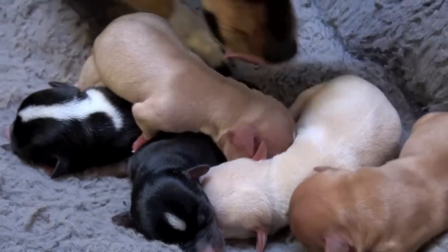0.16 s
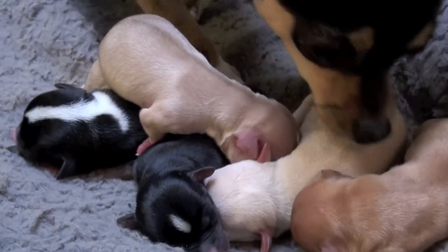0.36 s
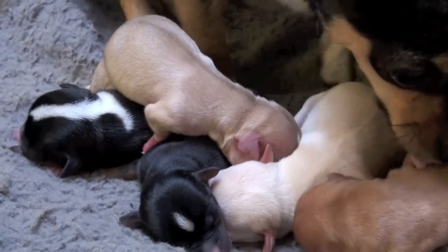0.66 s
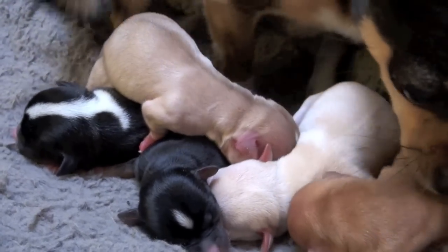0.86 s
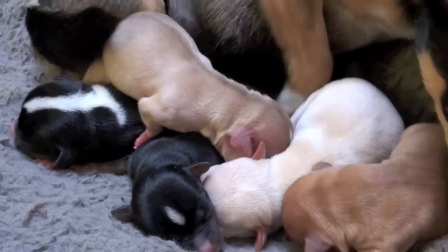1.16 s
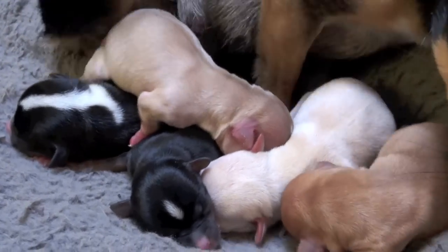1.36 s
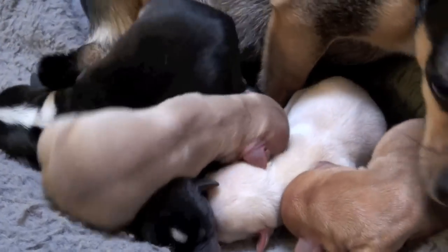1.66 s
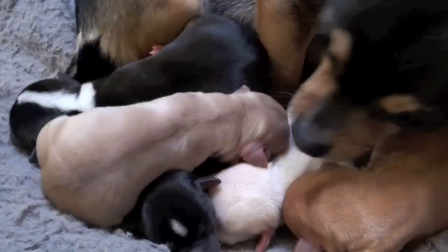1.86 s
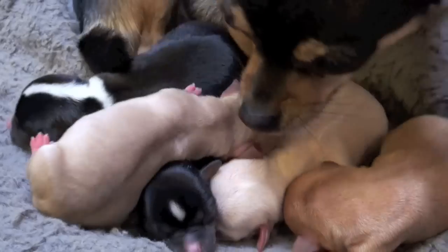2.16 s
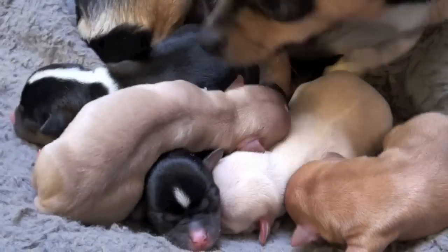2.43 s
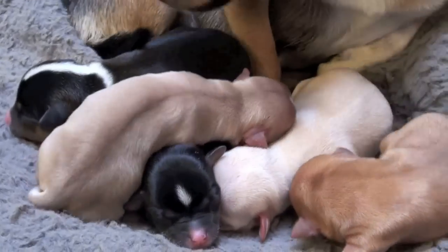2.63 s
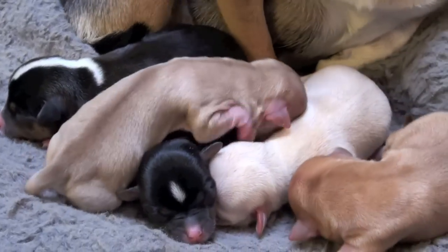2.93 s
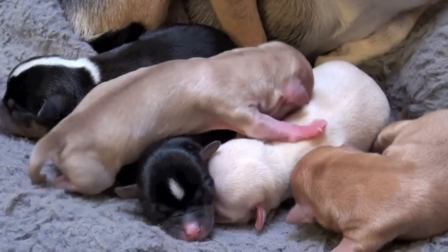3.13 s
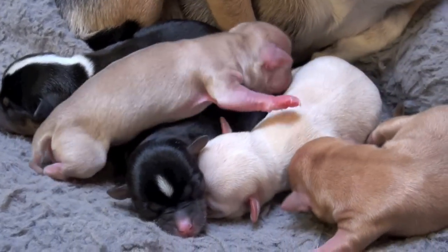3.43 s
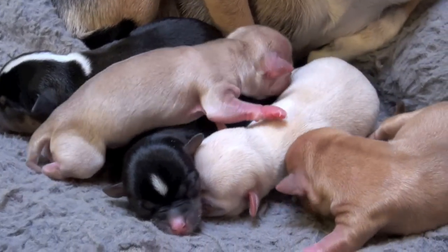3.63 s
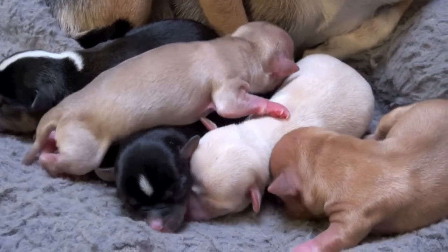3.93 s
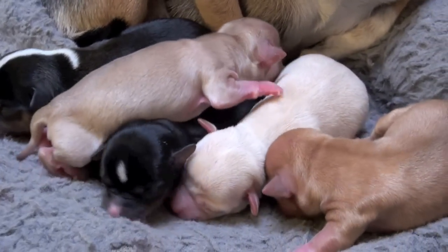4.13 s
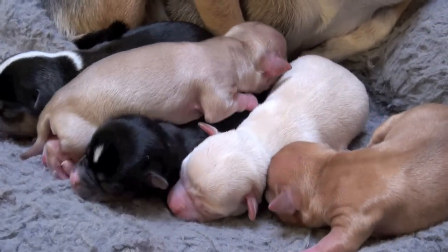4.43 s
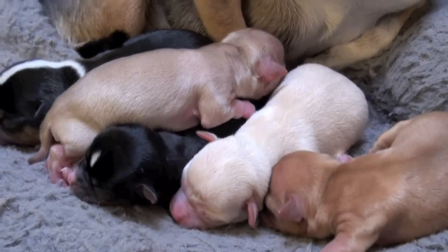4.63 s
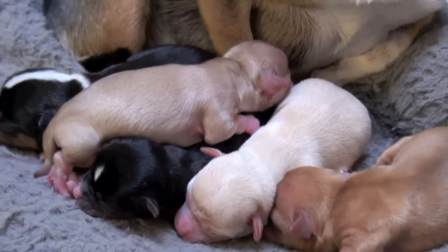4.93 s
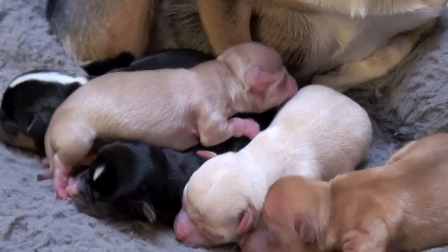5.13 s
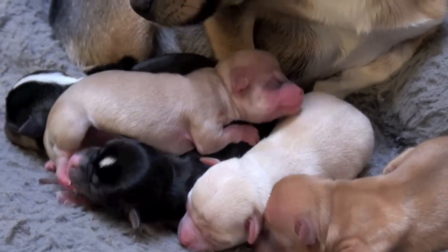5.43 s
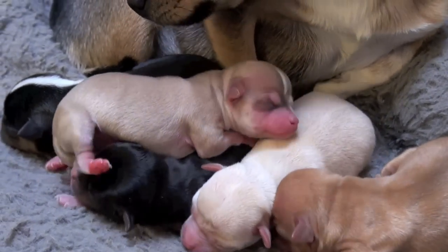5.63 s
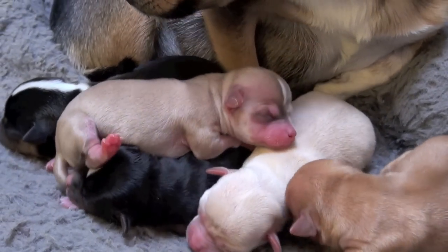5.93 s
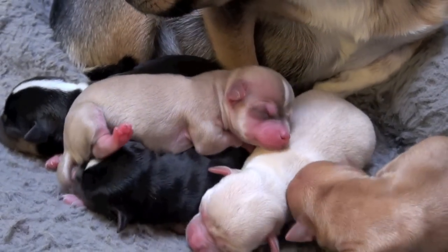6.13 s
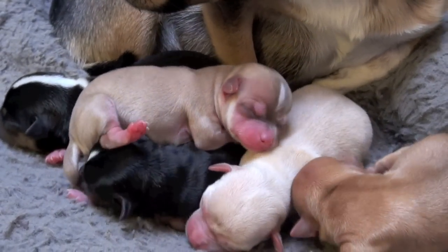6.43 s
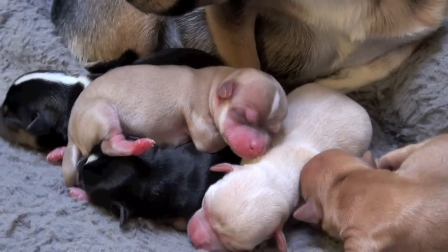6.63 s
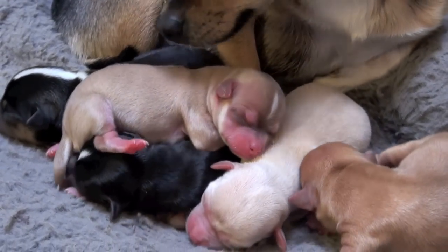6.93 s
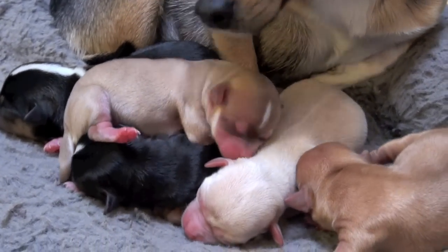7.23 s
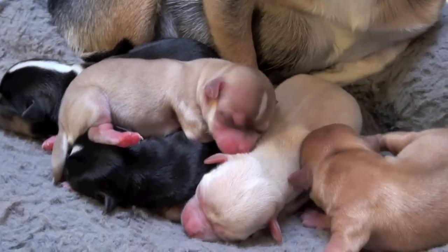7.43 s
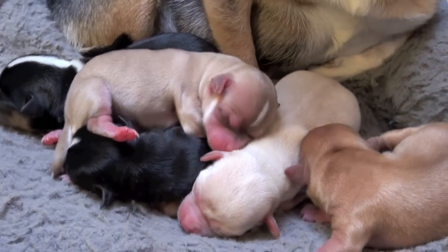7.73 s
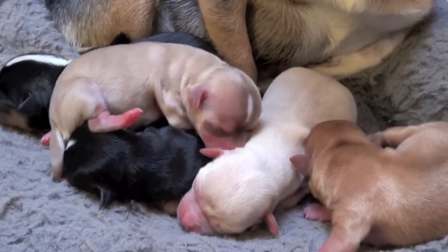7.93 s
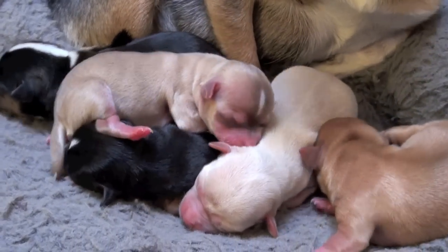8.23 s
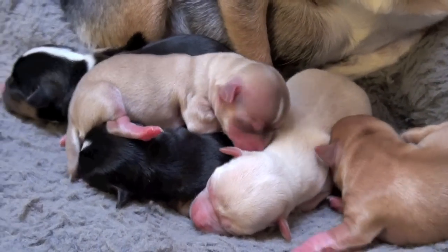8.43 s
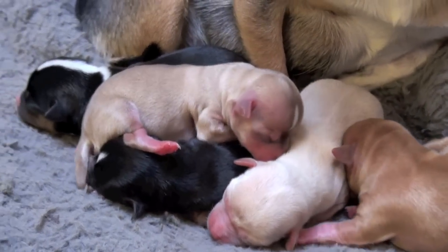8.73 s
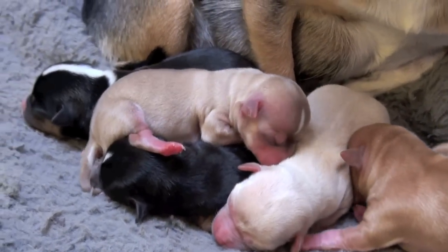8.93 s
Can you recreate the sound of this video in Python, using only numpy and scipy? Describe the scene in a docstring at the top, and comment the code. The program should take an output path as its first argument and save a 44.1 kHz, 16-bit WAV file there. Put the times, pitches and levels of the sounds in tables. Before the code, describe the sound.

A heap of newborn puppies heard very close in a small furnished room. A squeal and sharp yelp open, then faint whines and wet licking. After a lull, louder wavering cries rise and fall, and the mother gives a low fluttering growl of about a second. Several puppies then cry together, thinning to small squeaks and a bump at the end. Blanket rustle and faint hum stay underneath.

```python
"""In a small room, newborn puppies squeak and whimper on a blanket near the microphone, often several at once.
Their cries are near-pure tones with overtones shaped by throat and nose; rasps are uneven pulse trains.
Their mother's licks are ringing noise bursts; her one short growl is flaps of vocal fold pulses with hiss.
The blanket rustles, as coloured noise with ticks, over room noise and a faint mains hum."""
import sys
import numpy as np
from scipy import signal
from scipy.fft import rfft, irfft, next_fast_len
from scipy.io import wavfile
from scipy.ndimage import uniform_filter1d, map_coordinates

SR = 44100
rng = np.random.default_rng(int(sys.argv[2]) if len(sys.argv) > 2 else 0)


def inscribe(sig):
    """Save sig as 16-bit PCM at rate SR to the path in sys.argv[1].

    A 1-D sig is mono; a 2-D sig holds one channel per row.
    Samples are clipped to [-1, 1] before scaling.
    """
    pcm = np.round(np.clip(np.atleast_2d(sig).T, -1, 1) * 32767)
    wavfile.write(sys.argv[1], SR, pcm.astype(np.int16))


N = 399976
TOP_HZ = 15800  # band limit
MID_PITCH_HZ = 1500  # middle of the puppies' pitch range

# courses of the wavering cries, referred to by WHIMPERS: t/s, pitch f/Hz, level/dB
SQUEAL = [(0.058, 1820, -56), (0.092, 1541, -42.5), (0.132, 1890, -40.5), (0.186, 2027, -40.5),
          (0.216, 1965, -43), (0.242, 1510, -42), (0.33, 910, -51)]
THIN_WHINE = [(0.33, 940, -48), (0.522, 1182, -58), (0.62, 1215, -58), (0.695, 1450, -60),
              (0.735, 1324, -54.5), (0.916, 1292, -50), (0.986, 1104, -52.5), (1.068, 1077, -55),
              (1.114, 1178, -55), (1.228, 1134, -53)]
LOW_WHINE = [(1.218, 1104, -53), (1.232, 872, -54.5), (1.266, 820, -60.5), (1.366, 928, -56.5),
             (1.5, 882, -56.5), (1.568, 1050, -46.5), (1.62, 1055, -52.5)]
CLIMBING_CRY = [(3.425, 1014, -53), (3.461, 1223, -43), (3.468, 1427, -42), (3.516, 1840, -40),
                (3.523, 1537, -39.5), (3.6, 1247, -46.5), (3.645, 1482, -40.5), (3.703, 1638, -32.5),
                (3.757, 1457, -39), (3.8, 1562, -40), (3.87, 1846, -32), (3.915, 1684, -33.5),
                (3.955, 1350, -36.5), (4.018, 972, -39)]
HIGH_CRY = [(4.725, 1464, -49.5), (4.799, 2175, -43.5), (4.804, 1740, -37), (4.85, 2153, -37.5),
            (4.887, 2184, -38), (5.015, 2072, -37), (5.05, 1970, -35), (5.12, 1914, -36.5),
            (5.225, 1982, -36), (5.289, 1746, -33.5), (5.34, 1388, -42.5)]
DOUBLE_CRY = [(5.61, 1430, -44.5), (5.668, 1874, -32), (5.752, 1560, -40.5), (5.836, 1826, -33),
              (5.89, 1798, -34), (5.97, 1543, -36.5), (6.07, 1346, -38.5)]
TRIPLE_CRY = [(6.32, 1455, -49), (6.358, 1980, -44), (6.42, 1696, -37), (6.47, 1646, -39.5),
              (6.53, 1797, -39.5), (6.598, 1825, -37), (6.665, 1620, -36.5), (6.73, 1764, -37),
              (6.77, 1596, -40), (6.85, 1052, -44.5)]
SHARP_CRY = [(7.07, 1270, -37), (7.092, 1560, -33.5), (7.108, 1293, -35), (7.145, 1640, -30),
             (7.195, 1786, -32.5), (7.245, 1788, -36.5), (7.29, 1967, -37), (7.347, 1938, -34),
             (7.375, 1688, -35), (7.403, 953, -37)]
ANSWER = [(7.15, 1206, -40.5), (7.19, 1545, -46), (7.244, 1612, -44), (7.306, 1370, -44.5),
          (7.406, 1492, -42.5), (7.482, 1031, -41), (7.55, 1140, -47)]
HELD_WHINE = [(7.245, 1275, -50), (7.282, 992, -44.5), (7.335, 1393, -53), (7.48, 1264, -54),
              (7.778, 1468, -52.5), (7.9, 1363, -55), (8.19, 1448, -56.5)]
SINKING_WHINE = [(7.485, 1645, -51), (7.519, 1834, -57), (7.559, 1705, -50), (7.603, 1211, -54.5),
                 (7.675, 1273, -49), (7.8, 630, -60.5)]
SOARING_CRY = [(7.705, 1100, -43.5), (7.745, 1570, -38.5), (7.846, 2270, -47), (7.89, 2117, -42.5),
               (7.924, 1743, -37.5), (7.957, 900, -40)]
LAST_CRY = [(8.205, 1413, -54), (8.222, 1416, -39), (8.272, 1650, -36), (8.315, 1668, -39.5),
            (8.36, 1843, -41.5), (8.395, 1450, -42), (8.432, 810, -49.5)]
CATCHING_WHINE = [(8.204, 1410, -45), (8.219, 1047, -44), (8.234, 1222, -47), (8.267, 1383, -41)]
LOUD_YELP = [(.166, 1300, -41), (.2, 1665, -28), (.25, 1762, -30), (.29, 1728, -34), (.322, 1280, -39.5)]
CREAKING_YELP = [(2.699, 831, -50), (2.718, 1008, -48), (2.748, 1014, -48.5), (2.768, 725, -53),
                 (2.801, 397, -66)]


def amp(db):
    """Amplitude factor of a level in dB."""
    return 10 ** (np.asarray(db) / 20)


def unit(x):
    """x scaled to rms 1."""
    return x / np.sqrt(np.mean(x ** 2) + 1e-20)


def along(points, hz):
    """(f/Hz, value) points, interpolated on a log frequency axis."""
    f, v = np.transpose(points)
    return np.interp(np.log(hz + 1), np.log(f + 1), v)


def curves(rows, t):
    """Each column after the time, interpolated at the times t."""
    s, *cols = np.transpose(rows)
    return [np.interp(t, s, c) for c in cols]


def span(start, end):
    """Sample times of a stretch and a gate with 2.3 ms edges."""
    t = np.arange(int(start * SR), int(max(end, start + .01) * SR)) / SR
    return t, np.clip(np.minimum(t - t[0], t[-1] - t) / 0.0023, 0, 1)


def add(track, s, x):
    """Mix x into the track at s seconds."""
    i = int(np.clip(s * SR, 0, N))
    track[..., i:i + x.shape[-1]] += x[..., :N - i]


def wobble(t, rate):
    """A smooth random curve, rate knots a second."""
    at = (t - t[0]) * rate
    return map_coordinates(rng.standard_normal(int(at[-1]) + 4), [at])


def filtered(x, response):
    """x with its spectrum multiplied by response(hz)."""
    m = next_fast_len(x.shape[-1] + 8192)
    hz = np.fft.rfftfreq(m, 1 / SR)
    return irfft(rfft(x, m) * response(hz), m)[..., :x.shape[-1]]


def noise(spectrum, size=N):
    """Coloured noise of rms 1."""
    return unit(filtered(rng.standard_normal(size), lambda hz: amp(along(spectrum, hz))))


def wide_noise(spectrum, side_db):
    """Stereo noise, nearly the same at both ports."""
    return noise(spectrum) + amp(side_db) * noise(spectrum) * np.array([[1], [-1]])


def tap(hz, t60, width):
    """A short decaying burst of one tone and a noise band around it, peak 1."""
    t = np.arange(SR // 8) / SR
    grit = noise([(hz / 4, -16), (hz, 0), (hz * 1.42, -4), (hz * 1.75, -19), (hz * 4, -32)], size=len(t))
    envelope = amp(-60 * t / t60) * (1 - np.exp(-t / 0.0002))
    x = (np.sin(2 * np.pi * hz * t) + width * grit) * envelope
    return x / np.abs(x).max()


def background(air_db, fibre_db):
    """Fur brushes the blanket, with single fibres ticking, over room noise and hum."""
    # stirring on the blanket, before a 2.7 dB cut: t/s, level/dB
    stirring = [(0, -53.5), (1.2, -54), (2.3, -54), (3.1, -56.5), (5, -53), (6.25, -50), (6.9, -54),
                (8.93, -52), (9.02, -45)]
    # colour of the rustle: f/Hz, gain/dB
    blanket = [(53, -40), (90, -11), (122, -3.5), (434, -7.5), (800, -6), (4840, -19), (15500, -22.5)]
    # colour of the room noise: f/Hz, gain/dB
    air = [(12, -48), (20, -5), (64, 2), (92, -4), (122, -34), (333, -33), (15500, -25.5)]
    # mains hum: t/s, fundamental level/dB, second harmonic level/dB; both waver
    hum_levels = [(0, -68, -63), (3, -71, -74), (4.8, -67, -72), (5.6, -61, -68)]
    mains_hz = 60
    t = np.arange(N) / SR
    stir = amp(curves(stirring, t)[0] - 2.7 + .8 * wobble(t, 12))
    ticks = (rng.random(N) < 25 / SR) * rng.standard_normal(N)  # about 25 a second
    fibres = unit(signal.fftconvolve(ticks, tap(3100, 0.0039, width=2.3))[:N])
    rustle = stir * (wide_noise(blanket, side_db=-11) + amp(fibre_db) * fibres)
    hum = np.zeros(N)
    for k, db in enumerate(curves(hum_levels, t), 1):
        level = amp(db + 1.5 * wobble(t, 15)) * np.sqrt(2)
        hum += level * np.sin(2 * np.pi * k * mains_hz * t + 2.2 * wobble(t, 12.0))
    return rustle + hum + amp(air_db) * wide_noise(air, side_db=-12)


def overtones(phase, hz, t, slope_db, dip_hz, flicker_db, count=7):
    """Harmonics above the fundamental, shaped by the throat to rms about 1, less the band that the nose swallows."""
    # a puppy's throat: f/Hz, gain/dB
    throat = [(1600, -0.5), (2100, 7.5), (3500, 9), (5100, 1.5), (5950, -8), (9000, -14), (15000, -19)]
    nose_dip_db, nose_half_width_octaves = 11.5, 0.19
    k = np.arange(2, count + 1)[:, None]
    gains = amp(along(throat, k * hz) + slope_db * np.log2(k)) * (k * hz < TOP_HZ)
    gains = gains / np.sqrt(np.sum(gains ** 2, axis=0) / 2)
    octaves_off = np.log2(k * hz / dip_hz)
    nose = amp(-nose_dip_db * np.exp(-(octaves_off / nose_half_width_octaves) ** 2))
    flicker = amp(flicker_db * np.array([wobble(t, 35.9) for _ in k]))
    return np.sum(gains * nose * flicker * np.sin(k * phase), axis=0)


def cry(t, hz, level_db, bright_db, slope_db, dip_hz, jitter=0.00356, shimmer=0.023):
    """Tiny vocal folds whistle almost purely; slack folds, at low pitch, tremble more and sound richer."""
    attack_s, release_s = .005, .003
    # per dB below the cry's peak: overtones weaken and fall off faster
    effort_bright_db, effort_tilt_db = 0.3, 0.02
    purity_db_per_octave = 5.5  # overtones fade as the pitch climbs
    pan_db = 0.26  # left over right
    gate = np.clip(np.minimum((t - t[0]) / attack_s, (t[-1] - t) / release_s), 0, 1)
    hz = uniform_filter1d(hz, size=350, mode="nearest")
    slack_db = level_db.max() - level_db
    slope_db = slope_db - effort_tilt_db * slack_db
    over_db = bright_db - effort_bright_db * slack_db - purity_db_per_octave * np.log2(hz / MID_PITCH_HZ)
    tremble = jitter * (MID_PITCH_HZ / hz) ** 2 * (wobble(t, 59.95) + wobble(t, 900))
    hz = hz * (1 + tremble)
    phase = 2 * np.pi * np.cumsum(hz) / SR
    tone = np.sqrt(2) * np.sin(phase)
    tone = tone + amp(over_db) * overtones(phase, hz, t, slope_db, dip_hz, flicker_db=2.5)
    voice = tone * gate * amp(level_db) * (1 + shimmer * wobble(t, 800))
    return voice * amp([[pan_db / 2], [-pan_db / 2]])


def rasp(start, end, pitch, db):
    """The folds slip to a low pitch and beat unevenly, each beat a decaying noise ring."""
    # throat of a rasp: f/Hz, gain/dB
    rasp_throat = [(450, -18), (750, -1), (2400, 0.5), (3800, -9), (6000, -17), (10000, -45)]
    t, gate = span(start, end)
    cycles = np.cumsum(pitch * (1 + .05 * wobble(t, pitch))) / SR
    pulses = np.diff(np.floor(cycles), prepend=0) * amp(2 * rng.standard_normal(len(t)))
    ring = rng.standard_normal(len(t)) * np.exp(-(t - t[0]) * pitch)
    beats = signal.fftconvolve(pulses, ring)[:len(t)]
    voice = filtered(beats, lambda hz: amp(along(rasp_throat, hz)))
    return amp(db) * gate * unit(voice)


def arch(t, top, start_hz, top_hz, end_hz):
    """The pitch of one push of breath: it rounds over at its top, with a start and an end of its own."""
    arch_power = 1.85  # 2 is a parabola, 1 a pointed roof
    rising = t < top
    away = np.abs(t - top) / np.maximum(np.where(rising, top - t[0], t[-1] - top), 1 / SR)
    return top_hz + (np.where(rising, start_hz, end_hz) - top_hz) * away ** arch_power


def puppies():
    """Wavering cries, short squeaks and rasps from the heap, all fluttering in the tremors."""
    # wavering cries: course, overtone level/dB, overtone slope/(dB/octave), nose dip f/Hz
    whimpers = [(SQUEAL, 6.6, -2, 6000), (LOUD_YELP, -5.5, -11, 2900), (THIN_WHINE, -2.2, -1.3, 3740),
                (LOW_WHINE, 3.2, -10.5, 3520), (CREAKING_YELP, 1, -18.5, 3000),
                (CLIMBING_CRY, -3.5, -7, 2750), (HIGH_CRY, -4.5, -3.5, 5220), (DOUBLE_CRY, -10.5, 0, 2060),
                (TRIPLE_CRY, -5, -1.7, 5000), (SHARP_CRY, -12, -0.78, 6700), (ANSWER, -4.5, -3, 4340),
                (HELD_WHINE, 0, -7, 2030), (SINKING_WHINE, 0.74, 2.8, 3060), (SOARING_CRY, -13, -4, 6700),
                (LAST_CRY, -16, -12, 5600), (CATCHING_WHINE, -7, -5, 4300)]
    # squeaks, one pitch arch each: t/s, rise/s, fall/s, start f/Hz, top f/Hz, end f/Hz,
    # level at the top/dB, overtone level/dB, overtone slope/(dB/octave)
    squeaks = [(1.66, 0.035, 0.012, 850, 966, 956, -51, 2, -4),
               (3.215, 0.0064, 0.058, 2070, 1875, 1570, -52, -10, 0),
               (3.985, 0.042, 0.087, 1344, 1563, 910, -36.5, -3.5, -17),
               (4.283, 0.053, 0.0032, 1660, 1874, 1800, -45, -11, -7),
               (4.331, 0.07, 0.051, 1422, 1540, 1190, -36.5, -8, -9),
               (4.449, 0.0016, 0.013, 1180, 1084, 694, -36.5, -15.5, 1),
               (7.645, 0.062, 0.0072, 784, 1113, 1100, -47.5, 0.5, -23),
               (8.089, 0.0086, 0.12, 2040, 2004, 1710, -50, -22, -10),
               (8.717, 0.022, 0.018, 1110, 1140, 1070, -50, -8.5, 1),
               (8.744, 0.058, 0.16, 1786, 1916, 1730, -48, -23, -12),
               (8.95, 0.042, 0.075, 1377, 1367, 1147, -42, -6.5, -11)]
    # rasps: start t/s, end t/s, pitch f/Hz, level/dB
    rasps = [(1.162, 1.224, 386, -48), (2.753, 2.803, 331, -55), (7.143, 7.41, 379.5, -50.5)]
    # flutter of a hard-pushed cry: start t/s, end t/s, rate f/Hz, depth [0-1]
    tremors = [(3.665, 3.745, 125, .5)]
    squeak_db_per_octave, squeak_dip_hz = 2.5, 3010  # level follows pitch
    out = np.zeros((2, N))
    for course, bright_db, slope_db, dip_hz in whimpers:
        t, _ = span(course[0][0], course[-1][0])
        hz, level_db = curves(course, t)
        add(out, t[0], cry(t, hz, level_db, bright_db, slope_db, dip_hz))
    for start, rise, fall, start_hz, top_hz, end_hz, db, bright_db, slope_db in squeaks:
        t, _ = span(start, start + rise + fall)
        hz = arch(t, start + rise, start_hz, top_hz, end_hz)
        level_db = db + squeak_db_per_octave * np.log2(hz / top_hz)
        add(out, start, cry(t, hz, level_db, bright_db, slope_db, squeak_dip_hz))
    for start, end, pitch, db in rasps:
        add(out, start, rasp(start, end, pitch, db))
    for start, end, rate, depth in tremors:
        t, _ = span(start, end)
        swing = np.sin(2 * np.pi * rate * t + wobble(t, 50))
        beat = np.zeros(N)
        add(beat, start, depth * np.sqrt(np.hanning(len(t))) * swing)
        out = out * (1 + beat)
    return out


def nuzzling():
    """Licks and bumps ring briefly in one broad resonance; a low grunt is a gated tone."""
    # wet smacks of tongue and lips: t/s (0.9 ms early), peak level/dB (before +10 dB), resonance f/Hz
    smacks = [(0.575, -44, 2420), (0.612, -34.5, 2530), (0.6406, -46.5, 2540), (1.432, -45, 3600),
              (1.476, -46, 3800), (1.493, -39, 3930), (2.0333, -41.5, 3040), (2.045, -40.5, 1600),
              (2.0679, -43, 3440), (2.0901, -42.5, 2440), (2.2722, -43, 4240), (3.739, -51, 1770),
              (6.4007, -37, 1540)]
    # soft bumps of bodies and paws: t/s, peak level/dB, f/Hz
    bumps = [(1.011, -40.5, 219.5), (1.1, -38.5, 189.7), (1.118, -38, 241), (5.027, -36, 436),
             (9.049, -25, 615), (9.052, -24, 255)]
    # low grunt: start t/s, end t/s, pitch f/Hz, level/dB
    grunts = [(8.872, 8.925, 137, -39)]
    out = np.zeros(N)
    for s, db, hz in smacks:
        add(out, s + 0.0009, amp(db + 10.0) * tap(hz, t60=12 / hz, width=0.91))
    for s, db, hz in bumps:
        add(out, s, amp(db) * tap(hz, t60=0.018, width=0.09))
    for start, end, hz, db in grunts:
        t, gate = span(start, end)
        add(out, start, amp(db) * gate * unit(np.sin(2 * np.pi * hz * (t - start))))
    return out


def pulse_response(spectrum, size=2048):
    """The causal, minimum-phase ring of a throat after one pulse, energy 1."""
    cepstrum = irfft(np.log(amp(along(spectrum, np.fft.rfftfreq(size, 1 / SR)))))
    ring = irfft(np.exp(rfft(2 * cepstrum[:size // 2], size)))
    return ring / np.linalg.norm(ring)


def flaps():
    """(t/s, level/dB, vocal fold cycles) of each flap of the growl."""
    # flutter, broadly slowing as the breath runs out: t/s, flap rate f/Hz, fold cycles per flap
    flutter = [(5.109, 34.8, 1), (5.138, 32.9, 2), (5.168, 30.7, 2), (5.265, 30.9, 2), (5.298, 28.9, 2),
               (5.471, 28.9, 2), (5.505, 26, 3), (5.582, 26, 3), (5.621, 23.7, 3), (5.663, 24.5, 3),
               (5.7, 27.1, 2), (5.966, 26.2, 2), (6.004, 23.7, 3), (6.047, 24.2, 3), (6.088, 20.3, 4)]
    # push of the growl: t/s, level/dB (relative)
    effort = [(5.11, -28), (5.3, -22.5), (6.05, -22), (6.09, -26.5), (6.14, -33.5)]
    s, end_s = 5.1088, 6.15
    while s < end_s:
        rate, cycles = curves(flutter, s)
        yield s, curves(effort, s)[0], int(np.round(cycles))
        s += 1 / rate


def growl(pulse_db, hiss_db, opening, lips_db, jaw_q):
    """The throat flaps 20 to 35 times a second; each flap passes one to four fold cycles and a puff of air.
    Loose lips and cheeks give every flap a colour of its own."""
    # fold pitch and bared teeth: t/s, f/Hz, hiss level/dB (relative)
    growl_pitch = [(5.12, 208, 4), (5.3, 197, 9), (5.47, 177, -4), (5.66, 161, -5), (5.72, 184, -5),
                   (5.93, 174, -6), (6.01, 156, -7), (6.09, 140, -5), (6.14, 92, -11)]
    # the mother's throat: f/Hz, gain/dB
    dog_throat = [(55, -34), (115, -16.5), (175, 7), (250, 1.5), (335, -2.5), (460, -4.5), (640, -3),
                  (900, -14.5), (1300, -17), (1900, -32.5), (2600, -52.5), (5000, -40), (12000, -59)]
    # air hissing through her teeth: f/Hz, gain/dB
    teeth = [(2000, -27), (4600, -12), (5500, -14), (8000, 16), (9800, -11), (11900, 7.5), (14000, -22)]
    # mouth opening and closing: t/s, resonance f/Hz, strength of its ring [factor]
    jaw = [(5.12, 645, 1.5), (5.25, 600, 0.86), (5.38, 850, 0.12), (5.55, 653, 0.44), (5.76, 760, .1),
           (6.02, 620, 0.19)]
    quickening = 1.04  # speed-up from one fold cycle to the next within a flap
    voice, flow, t = np.zeros(N), np.zeros(N), np.arange(N) / SR
    bands_hz = np.geomspace(50, TOP_HZ, num=40)
    for start, db, number in flaps():
        pulses = np.zeros(SR // 10)
        hz = curves(growl_pitch, start)[0] * np.exp(0.012 * rng.standard_normal())
        lead = closing = 1 / hz
        for k in range(number):
            # the folds kick the air weakly as they open and harder as they close
            cycle = 1 / (hz * quickening ** k)
            opening_s = closing - cycle * rng.normal(.5, .025)
            add(pulses, opening_s, opening * amp([db + 2 * rng.standard_normal()]))
            add(pulses, closing, amp([db + rng.standard_normal()]))
            closing += cycle
        slack_db = lips_db * np.minimum(bands_hz / 900, 1) * rng.standard_normal(len(bands_hz))
        throat = np.transpose([bands_hz, along(dog_throat, bands_hz) + slack_db])
        flap = signal.fftconvolve(pulses, pulse_response(throat))
        jaw_hz, gape = curves(jaw, start)
        mouth = signal.lfilter(*signal.iirpeak(jaw_hz, jaw_q, SR), flap)
        add(voice, start - lead, flap + gape * mouth)
        puff = np.exp(-t[:len(pulses)] / 0.00099)
        add(flow, start - lead, signal.fftconvolve(pulses, puff))
    bared_db = curves(growl_pitch, t)[1]
    return amp(pulse_db) * voice + amp(hiss_db + bared_db) * flow * noise(teeth)


def room(x, side_db):
    """A small furnished room: a short, soft tail of decaying noise, 5 ms late."""
    # decay: f/Hz, t60/s
    decay = [(150, 0.17), (10000, 0.21)]
    hz, t, z = signal.stft(rng.standard_normal((2, SR // 3)), SR, nperseg=256)
    mid, side = signal.istft(z * amp(-60 * t / along(decay, hz)[:, None]), SR, nperseg=256)[1]
    tail = (mid + amp(side_db) * side * np.array([[1], [-1]])) / np.linalg.norm(mid)
    return signal.fftconvolve(x, np.pad(tail, ((0, 0), (SR // 200, 0))), axes=1)[:, :N]


def scene():
    """The heap of dogs close by, a little of the room, and the background."""
    mother = growl(pulse_db=22.5, hiss_db=-22.5, opening=0.55, lips_db=3, jaw_q=3.7)
    near = puppies() + mother + nuzzling()
    return near + amp(-12.5) * room(near, side_db=-14.5) + background(air_db=-69.5, fibre_db=-12.5)


def record(dry):
    """Two close ports hear nearly alike; nothing is kept above the band limit."""
    # stereo width: f/Hz, gain of the ports' difference/dB
    width = [(40, -16), (120, -3.5), (250, 5), (700, 9.5), (4000, 10.5), (8500, 7.5), (13000, -8.5)]
    mid, side = (dry[0] + dry[1]) / 2, (dry[0] - dry[1]) / 2
    side = filtered(side, lambda hz: amp(along(width, hz)))
    return filtered(np.array([mid + side, mid - side]), lambda hz: hz < TOP_HZ)


dry = scene()
out = record(dry)
inscribe(out)
```